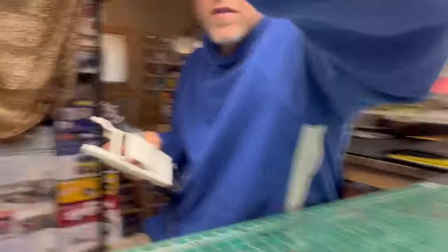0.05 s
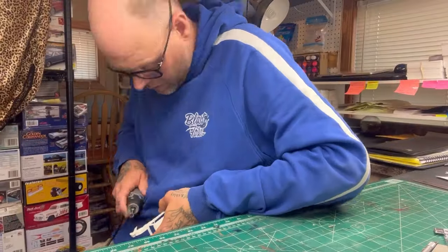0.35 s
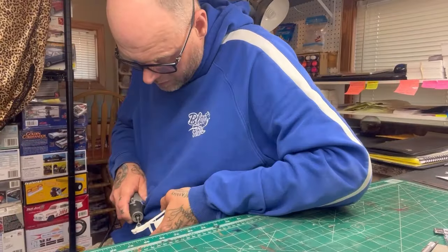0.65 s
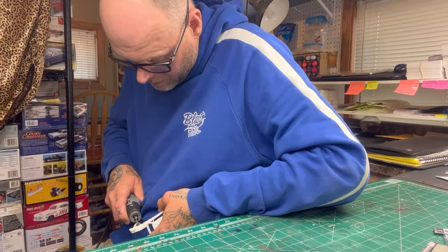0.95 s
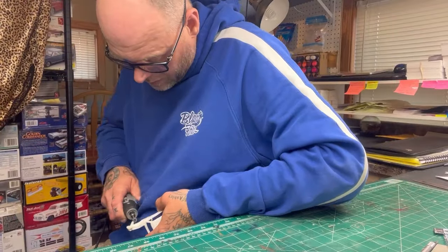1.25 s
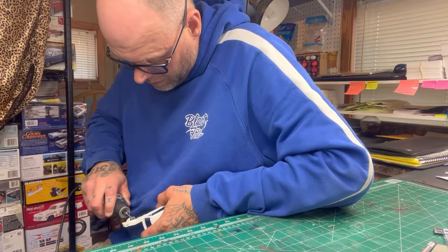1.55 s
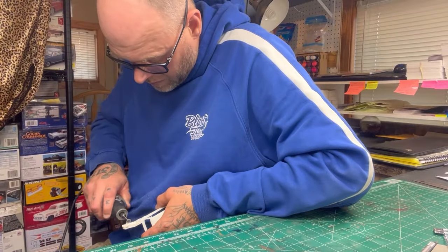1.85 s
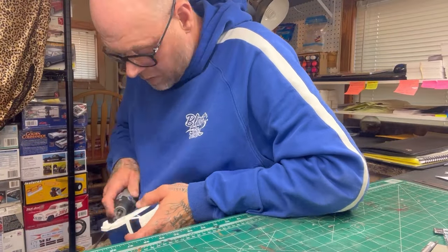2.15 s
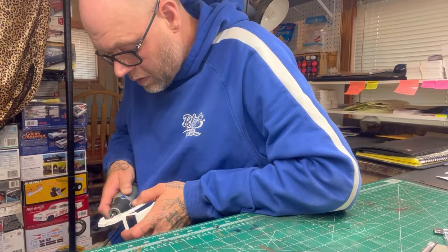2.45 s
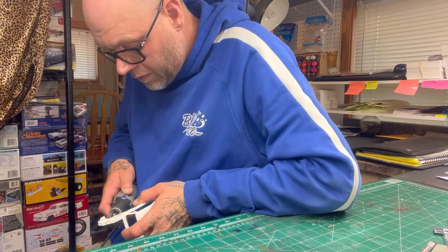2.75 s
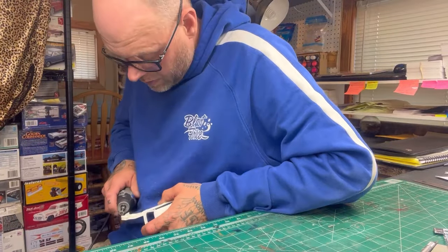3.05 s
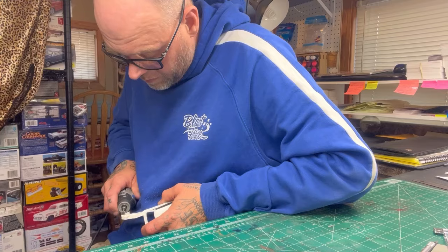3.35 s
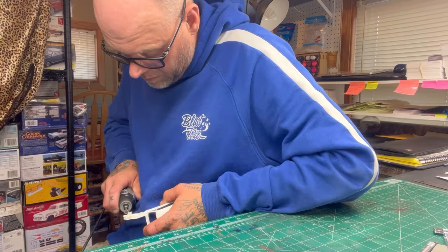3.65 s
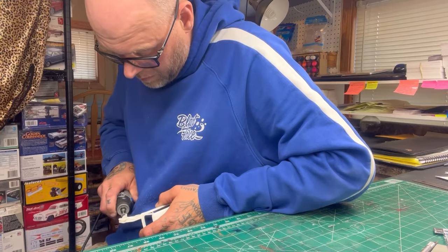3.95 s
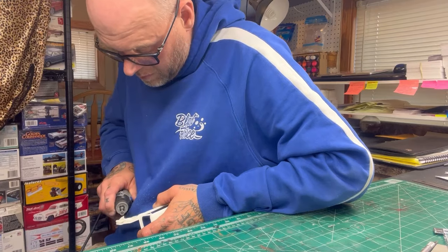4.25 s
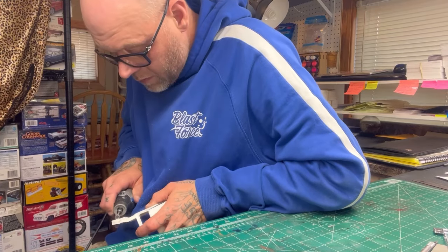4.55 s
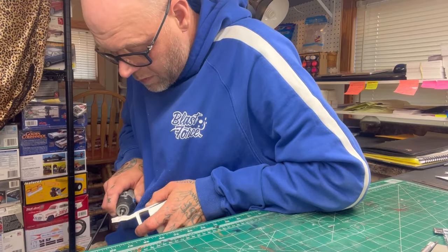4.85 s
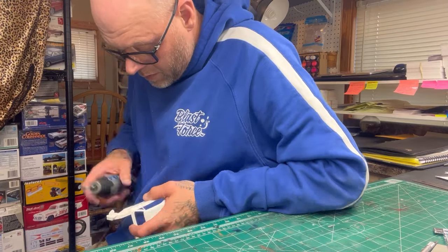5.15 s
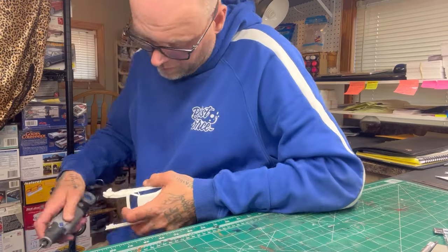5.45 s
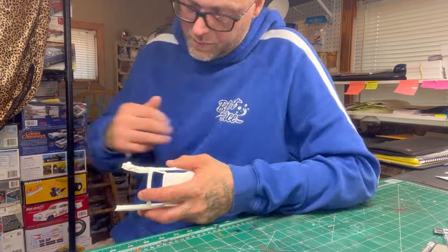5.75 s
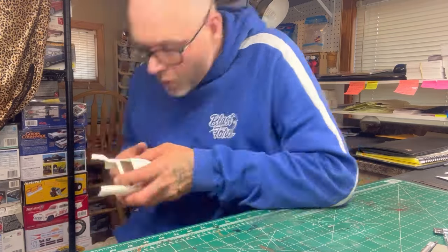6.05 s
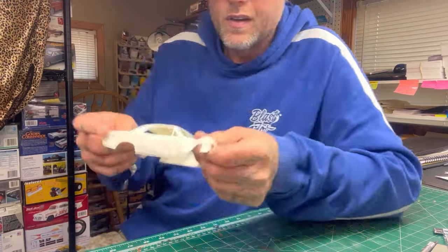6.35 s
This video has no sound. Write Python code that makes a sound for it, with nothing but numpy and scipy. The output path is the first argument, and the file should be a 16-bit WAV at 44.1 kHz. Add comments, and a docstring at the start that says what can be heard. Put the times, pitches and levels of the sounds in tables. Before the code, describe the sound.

A few light clacks of a tool being handled open the first quarter second. At about 0.4 seconds a small cordless rotary tool starts, with a thin, high whine and an airy hiss. From 0.6 to 1.3 seconds the bit presses twice into a plastic model body, buzzing and grinding as the motor slows, and the edge gives piercing squeals, loudest around 1.2 seconds. From 1.5 seconds the bit skims the plastic in short scrapes over the whine. Between 2.5 and 5 seconds these become quick, raspy dabs, with sharp ticks as it snags on the hollow shell. The tool is switched off at 5.5 seconds and knocks on the workbench at about 5.7, followed by a few lighter taps. Hands and sleeves brush softly over the model until about 6.3 seconds. Everything is close, in a small, dry room with faint background noise.

```python
"""A small cordless rotary tool trims a plastic model body at a workbench in a cluttered room. First a few
handling clacks sound. The motor starts and its chopped drive whines. The bit is pressed in, biting once a turn,
until drag slows the shaft and the thin edge squeals; then it dabs and skims the edge, snagging on the hollow
shell. At last the tool is switched off and knocks on the bench as it is set down, and hands and sleeves brush
the model."""
import sys
import numpy as np
from scipy import signal
from scipy.fft import rfft, irfft, next_fast_len
from scipy.io import wavfile
from scipy.ndimage import uniform_filter1d, map_coordinates

SR = 44100
rng = np.random.default_rng(int(sys.argv[2]) if len(sys.argv) > 2 else 0)


def master(y):
    """Save y as 16-bit WAV."""
    cut = np.clip(np.atleast_2d(y).T, -1, 1)
    pcm = np.round(cut * 32767)  # scale
    wavfile.write(sys.argv[1], SR, pcm.astype(np.int16))


N = 282715
TIME = np.arange(N) / SR

# Spectra of the room noise and its closing rumble. Each row: frequency in Hz, relative level in dB.
AIR = [(24, -84), (40, -47), (124, -38.5), (215, -20), (422, -1), (600, -4.5), (663, -7), (810, -5.5),
       (1090, -8), (1240, -12), (1720, -13.5), (2210, -13), (4680, -32.5), (16000, -35.5)]
RUMBLE = [(20, -9), (65, -2.5), (130, -6.5), (220, -10), (400, -26), (1500, -37)]
# Reverberation. Each row: frequency in Hz, time to decay by 60 dB in seconds.
ROOM_DECAY = [(200, 0.18), (2000, 0.1), (14000, 0.069)]
# Level difference between the ears. Each row: frequency in Hz, left over right in dB.
EAR_LEVEL = [(60, -6), (130, 7), (290, -7), (640, -6.5), (1410, -6), (3100, -5.5), (6820, -1.5),
             (15000, -7)]
# Phase difference between the ears. Each row: frequency in Hz, lead of the left in radians.
EAR_PHASE = [(0, 2.95), (2580, 1.5), (2930, 0.24), (3790, 4.6), (5000, 0.5), (5680, 8.07), (6290, 7.12),
             (16500, 7.17)]
# Strokes of hands and sleeves. Each row: start and end in seconds, level in dB, cutoff in Hz.
BRUSHES = [(0.193, 0.24, -61.5, 11900), (5.555, 5.587, -50.5, 8900), (5.783, 5.858, -49, 5430),
           (5.847, 5.879, -49.5, 5240), (5.892, 5.921, -48, 5530), (5.938, 5.962, -47, 5400),
           (5.99, 6, -44, 5060), (5.999, 6.07, -64, 12600), (6.105, 6.126, -35.5, 14700),
           (6.133, 6.31, -69.5, 10600), (6.197, 6.277, -55.5, 4440)]
# Spectrum of their friction. Each row: frequency in Hz, relative level in dB.
CLOTH = [(200, -27.5), (400, 5), (1500, -1.5), (2800, 2), (3600, 1.5), (4800, -2), (7000, -5), (11000, 2.5),
         (16000, 2)]
# Handling clacks and blows on the bench. Each row: start in seconds, relative levels of ring and crack # in dB,
# cutoff of the crack in Hz, left over right in dB.
HANDLING_CLACKS = [(.0115, -18, -14, 13900, -9), (.0428, -37, -17.5, 13100, -20.5), (.0475, -17, -27, 12000, 8),
                   (.0822, -6, -7, 5700, -6.5), (.085, -32, -15, 4400, 20.5), (.1145, -18.5, -26.5, 8100, -9),
                   (.227, -64.5, -30, 5650, -13.5)]
BENCH_KNOCKS = [(5.567, -52, -35, 5600, -19), (5.659, -30, -11, 2700, -11), (5.6607, -12.5, -45, 2530, -17),
                (5.6725, -44, -29.5, 7100, 18), (5.6755, -40, -27, 4040, -27),
                (5.854, -56, -31.5, 3760, -23), (5.90, -31, -25, 4350, -13.5),
                (6.218, -34.5, -35, 4004, -10)]
# Modes of the struck bodies. Each row: frequency in Hz, relative level in dB, 60 dB decay in seconds.
HANDLED_MODES = [(490, -12, 0.079), (740, -7, 0.017), (857, 4, 0.021), (1340, -10.5, 0.027), (2600, -9, .012)]
BENCH_MODES = [(377, -12, 0.073), (472, -6, 0.055), (655, 2.5, 0.02), (860, 7, 0.0085), (1195, 1, 0.017),
               (1280, 1, 0.012), (2780, -1, 0.013)]
SHELL_MODES = [(2337, 0.5, 0.015), (2510, 0.5, 0.018)]
# Spectrum of motor brushes and cooling air. Each row: frequency in Hz, relative level in dB.
MOTOR_HISS = [(120, -43), (200, -39), (448, -6.5), (2380, -15), (2860, -5.5), (3190, -9.5), (5040, -12),
              (5520, -15.5), (7140, -13.5), (10100, -20.5), (12200, -9.5), (16000, -21.5)]
# Shaft and bearing lines. Each row: multiple of the shaft rate, relative level in dB, jitter in Hz.
MOTOR_ORDERS = [(1, -12.5, 25), (2, -18, 20), (7, -22, 55), (8, -21, 65), (9, -21, 75), (11, -21, 120),
                (12.05, -9.5, 70), (13, -19, 110), (15.1, -25, 120)]
# Tones of the chopped drive. Each row: multiple of the drive rate, level relative to the whine in dB.
DRIVE_TONES = [(1, -21), (2, -19), (3, -1)]
# The whine's overtones. Each row: drive multiple to which the shaft rate adds, relative level in dB.
SIDEBANDS = [(3, 0), (4, -6), (5, -2), (7, 0), (13, -4), (15, -2)]
# Envelopes of the whine and of its overtones. Each row: time in seconds, level in dB.
WHINE_LEVEL = [(0.46, -54), (.6, -56), (.97, -53), (1.25, -57), (1.5, -54.5), (2.13, -53), (2.19, -61.5),
               (2.3, -53), (2.58, -65), (2.7, -55), (2.9, -64), (3.15, -62), (3.7, -56), (4.09, -55.5),
               (4.18, -70), (4.25, -58.5), (4.55, -54.5), (4.85, -57.5), (5.48, -53)]
SIDEBAND_LEVEL = [(.5, -64), (2.1, -72), (2.3, -60), (3.0, -64), (3.4, -64.5), (4.4, -72), (5.4, -69)]
# The shell's forced vibration. Each row: multiple of the shaft rate, level at full load in dB.
GROAN_ORDERS = [(1, -48), (5, -50), (6, -47.5), (7, -48.5), (8, -51)]
# Squeals of the edge. Each row: start and end in seconds, frequency in Hz, level in dB.
SQUEALS = [(0.898, 1.042, 12760, -37), (1.122, 1.16, 14300, -31), (1.143, 1.175, 13200, -25.5),
           (1.187, 1.213, 12940, -28), (1.215, 1.248, 12670, -26), (1.868, 1.885, 5067, -36),
           (3.622, 3.633, 8215, -27)]
# Spectra of the three voices of the cut. Each row: frequency in Hz, relative level in dB.
SHELL = [(900, -23), (1800, -13.5), (2400, -2.5), (3000, -5.5), (3650, -1), (4250, 4.5), (4650, -3),
         (5100, 9), (5700, -12), (7000, -48)]
SCRAPE = [(4500, -33), (5600, -4), (6400, 0), (6900, -1.5), (8000, 6.5), (9200, -3.5), (10100, -8),
          (12000, -39)]
SIZZLE = [(9800, -29), (11200, -3.5), (12600, -2), (13100, 3), (13600, 1.5), (14400, -4), (15200, 0.5),
          (17000, -5)]
# Two long presses, a curve each. Each row: time in seconds, level and shell boost in dB, drag in Hz.
PRESSES = [
    [(.612, -45.5, -4, 45), (.74, -39.5, -5.5, 125.9), (.78, -37.5, -11, 229), (.85, -40.5, -7, 228.6),
     (.91, -39.5, -11, 314.6), (1.045, -41, -17, 323.7)],
    [(1.1, -43, -9, 160), (1.15, -42.5, -5, 335.2), (1.215, -34.5, -10, 317.7), (1.24, -24, -11, 309.4),
     (1.254, -27.5, -7.5, 304)],
]
# Short cuts along the edge. Each row: start and end in seconds, level and shell boost in dB, drag in Hz.
CUTS = [(1.548, 1.612, -47, -10.5, 50), (1.65, 1.668, -36.5, -8, 127), (1.72, 1.857, -50, -2.5, 44.6),
        (1.867, 1.887, -32.5, -15, 206), (1.982, 2.09, -44.5, -7, 85), (2.265, 2.329, -45, -15, 12),
        (2.344, 2.398, -41.5, -7, 145), (2.44, 2.503, -45.5, -1, 97), (2.51, 2.537, -35, -12, 76),
        (2.627, 2.655, -48.5, -5, 32), (2.708, 2.76, -43, -6.5, 70), (2.772, 2.797, -40, -10, 78),
        (2.8, 2.816, -49, -1, 51), (3.131, 3.148, -37, -2, 27.5), (3.228, 3.248, -36, -8.5, 31.2),
        (3.321, 3.344, -33.5, -10.5, 115), (3.476, 3.493, -34, -8, 48.7), (3.53, 3.548, -43.5, 0, 18.8),
        (3.551, 3.58, -34.5, -10.5, 142), (3.616, 3.654, -40, -5.5, 133), (3.743, 3.76, -37.5, -3, 100),
        (3.783, 3.815, -46, -17, 8.1), (3.817, 3.833, -33.5, -9.5, 33), (3.876, 3.895, -34, -10, 67),
        (3.914, 3.953, -31, -10.5, 165), (3.962, 3.999, -29.5, -16.5, 152),
        (4.144, 4.175, -46.5, -33, 23.4), (4.235, 4.29, -50.5, -17, 7.5), (4.402, 4.426, -33, -8, 103),
        (4.459, 4.54, -46, -5.5, 83), (4.614, 4.656, -56, 1, 73), (4.705, 4.752, -41.5, -15, 13.8),
        (4.79, 4.818, -39.5, -12, 14), (4.829, 4.856, -40, -10, 21.8), (4.869, 4.882, -43.5, -7, 8.6),
        (5.02, 5.046, -36.5, -0.5, 74)]
# Snags of the bit. Each row: start in seconds, then level, shell boost and knock level in dB.
SNAGS = [(1.103, -36.5, -16, -56), (2.503, -35.5, 1.5, -33.5), (2.69, -38, -2, -33),
         (3.032, -31.5, -7, -40), (3.132, -43, -2, -35.5), (3.172, -32, -3.5, -42), (3.273, -36, -5.5, -47),
         (3.285, -42.5, -4, -55), (3.323, -44, -0.5, -38), (3.372, -42, -1, -49), (3.551, -29, -9.5, -54),
         (3.675, -41, -3.5, -39.5), (3.904, -29.5, -13, -49), (3.96, -30.5, -12, -54),
         (4.058, -30, -15, -42), (4.093, -39, -9.5, -39), (4.402, -32, -8.5, -47), (4.542, -42, 4, -40),
         (4.83, -32.5, -13, -63), (4.931, -31, -11, -39.5)]

ON_S, OFF_S, HISS_END_S = .4, 5.5, 5.6
DRIVE_HZ, FREE_HZ = 972, 1000  # chopping rate; shaft rate when warm and unloaded
COLD_SAG_HZ, WARM_UP_S, HUNT_DEPTH_HZ = 80, 1.3, 6.5
INERTIA_S, COAST_HZ_PER_S = .045, 440
MOTOR_DB, COLD_DB, COAST_DB = -52.5, -2, -5  # base level; change when cold; change when coasting
SNAG_S, SNAG_DRAG_HZ = .004537, 259.6
DAB_S, RASP_S, HEAVY_DB = .061, .032, -40  # short touches dab; shorter or heavier ones rasp
SWELL_DB, DAB_FADE_DB = 3.5, 6  # a cut deepens as it goes, but a dab fades
SHELL_RISE, SIZZLE_FALL = 1.134, .78  # frequency factors reached along the edge
TOP_HZ = 15950


def amp(db):
    """Decibels to amplitude ratio."""
    return 10 ** (np.asarray(db) / 20)


def unit(x):
    """Normalisation to rms 1."""
    return x / np.sqrt(np.mean(x ** 2) + 1e-20)


def along(points, hz):
    """Interpolation of (Hz, value) points on a logarithmic frequency axis."""
    knots_hz, values = np.transpose(points)
    return np.interp(np.log(hz + 1), np.log(knots_hz + 1), values)


def curves(rows):
    """Linear interpolation in time of each column after the first."""
    times, *columns = np.transpose(rows)
    return [np.interp(TIME, times, column) for column in columns]


def wobble(rate):
    """Smooth random modulation with rate knots a second."""
    return map_coordinates(rng.standard_normal(int(N * rate / SR) + 4), [TIME * rate], order=2)


def filtered(x, response):
    """Filtering as multiplication of the spectrum by a frequency response."""
    size = x.shape[-1]
    padded = next_fast_len(size + 8192)
    return irfft(rfft(x, padded) * response(np.fft.rfftfreq(padded, 1 / SR)), padded)[..., :size]


def coloured(x, spectrum):
    """Spectral shaping by (Hz, dB) points, at rms 1."""
    return unit(filtered(x, lambda hz: amp(along(spectrum, hz))))


def noise():
    """White Gaussian noise."""
    return rng.standard_normal(N)


def phase(hz):
    """Phase as the time integral of frequency."""
    return 2 * np.pi * np.cumsum(hz) / SR


def gate(start, end, rise, fall):
    """An envelope with linear attack and exponential release, all in seconds."""
    return np.clip((TIME - start) / rise + .5, 0, 1) * np.exp(-np.clip((TIME - end) / fall, 0, 30))


def background():
    """Ambient noise, partly coherent between the ears, gives way to a low rumble at the very end."""
    shared = noise()
    air = coloured(np.array([1.72 * shared + .5 * noise(), shared + 1.9 * noise()]), AIR)
    late = np.clip((TIME - 6.31) / .012, 0, 1)
    return amp(-57 - 5.4 * late) * air + amp(-53.5) * late * coloured(noise(), RUMBLE)


def room(x):
    """Reverberation: a diffuse tail, different at each ear, decays fastest in the treble."""
    hz, t, spectra = signal.stft(rng.standard_normal((2, SR // 3)), SR, nperseg=256)
    tail = signal.istft(spectra * amp(-60 * t / along(ROOM_DECAY, hz)[:, None]), SR, nperseg=256)[1]
    delayed = np.pad(x, (130, 0))[None]
    return signal.fftconvolve(delayed, tail / np.linalg.norm(tail[0]), axes=1)[:, :N]


def placed(work, tone):
    """Interaural differences set both to the right; moving hands and clutter scatter only the work."""
    t = np.arange(SR // 40) / SR
    clutter = rng.standard_normal((2, 2, len(t))) * amp(-60 * t / .021) * (t > .001)
    one, other = [signal.fftconvolve(work, c / np.linalg.norm(c[0]), axes=1)[:, :N] for c in clutter]
    pose = 2 * wobble(2)
    scattered = np.cos(pose) * one + np.sin(pose) * other
    side = np.array([[.5], [-.5]])
    bench_echo = lambda hz: 1 + .013 * np.exp(-2j * np.pi * hz * .00137)
    direct = filtered(work + tone, lambda hz: np.exp(1j * side * along(EAR_PHASE, hz)) * bench_echo(hz))
    return filtered(direct + amp(-6.5) * scattered, lambda hz: amp(side * along(EAR_LEVEL, hz)))


def low_cut(x, cutoff_hz):
    """A high-pass filter takes away the bass."""
    return signal.sosfilt(signal.butter(4, cutoff_hz, "highpass", fs=SR, output="sos"), x)


def brushing():
    """Sliding friction of skin and cloth on plastic makes short strokes of grainy noise."""
    grain = coloured(noise() * amp(4.8 * wobble(700)), CLOTH)
    out = np.zeros(N)
    for start, end, db, top_hz in BRUSHES:
        stroke = unit(filtered(grain, lambda hz: 1 / np.sqrt(1 + (hz / top_hz) ** 6)))
        out += amp(db) * gate(start, end, .0098, .008) * stroke
    return out


def blows(rows, modes):
    """An impact gives a broadband crack and excites the damped modes of the struck body."""
    out, t = np.zeros((2, N + SR)), np.arange(SR // 8) / SR
    for start, ring_db, crack_db, top_hz, pan_db in rows:
        ring = sum(amp(db + rng.normal() - 60 * t / t60) * np.sin(2 * np.pi * hz * t)
                   for hz, db, t60 in modes)
        burst = rng.standard_normal(len(t))
        grit = unit(filtered(burst, lambda hz: (hz > 400) / np.sqrt(1 + (hz / top_hz) ** 6)))
        dull = filtered(grit, lambda hz: 1 / np.sqrt(1 + (hz / 2500) ** 2))
        crack = grit * amp(-60 * t / .014) + dull * amp(-29 - 60 * t / .08)
        sound = amp(ring_db - 16) * ring + amp(crack_db - 10.5) * crack
        out[:, round(start * SR):][:, :len(t)] += amp([[pan_db / 2], [-pan_db / 2]]) * sound
    return out[:, :N]


def cold():
    """Exponential relaxation from 1 at switch-on towards 0 as the motor warms."""
    return np.exp(-np.clip(TIME - ON_S, 0, None) / WARM_UP_S)


def touches():
    """All brief contacts, cuts and snags alike, in the columns of CUTS."""
    return list(CUTS) + [(s, s + SNAG_S, db, shell_db, SNAG_DRAG_HZ) for s, db, shell_db, _ in SNAGS]


def shaft_speed():
    """Inertia makes the shaft rate, in Hz, lag behind its load; switched off, the shaft coasts."""
    drag = sum(hz * ((TIME >= start) & (TIME < end)) for start, end, _, _, hz in touches())
    for press in PRESSES:
        drag = drag + curves(press)[2] * ((TIME >= press[0][0]) & (TIME < press[-1][0]))
    target = (FREE_HZ + HUNT_DEPTH_HZ * wobble(7) - COLD_SAG_HZ * cold() - drag) * (TIME > ON_S)
    pole = np.exp(-1 / (INERTIA_S * SR))
    lagged = signal.lfilter([1 - pole], [1, -pole], target)
    return np.clip(lagged - COAST_HZ_PER_S * np.clip(TIME - OFF_S, 0, None), 0, None)


def motor(speed):
    """Brushes and cooling air hiss; shaft and bearing lines follow the rotation and fade as it slows."""
    sputter = amp(2.4 * wobble(900))
    hiss = coloured((noise() + .5 * np.array([noise(), noise()])) * sputter, MOTOR_HISS)
    lines = sum(amp(db + .83 * wobble(24)) * np.sin(phase(order * speed + jitter_hz * wobble(500)))
                for order, db, jitter_hz in MOTOR_ORDERS)
    running = np.clip((speed - 450) / 100, 0, 1) * gate(ON_S, HISS_END_S, .01, .012)
    level = running * amp(MOTOR_DB + COLD_DB * cold() + COAST_DB * (TIME > OFF_S))
    powered = gate(ON_S, OFF_S, .01, .035)
    return level * (amp(-1.5) * hiss + np.sqrt(2) * powered * (speed / DRIVE_HZ) ** 6 * lines)


def whine(speed):
    """Rotation modulates the chopped drive: sidebands droop under load and beat with it when free."""
    chop, turn = phase(DRIVE_HZ + .39 * wobble(7.3)), phase(speed)
    tones = sum(amp(db) * np.sin(order * chop) for order, db in DRIVE_TONES)
    sidebands = sum(amp(db + 2.5 * wobble(14)) * np.sin(order * chop + turn) for order, db in SIDEBANDS)
    free = np.clip((speed - 780) / 130, .3, 1)
    flicker_db = 2.6 * wobble(35) - 1.3
    beating = amp(curves(WHINE_LEVEL)[0] + flicker_db) * (np.sin(2 * chop + turn) + free * tones)
    return gate(.445, OFF_S, .028, .0043) * (beating + amp(curves(SIDEBAND_LEVEL)[0]) * sidebands)


def shell_knocks():
    """Free vibration: each snag rings the hollow shell, at a slightly different pitch for each spot."""
    out, t = np.zeros(N), np.arange(SR // 20) / SR
    for start, _, _, knock_db in SNAGS:
        detune = 1 + .035 * rng.normal()
        ring = sum(amp(db - 60 * t / t60) * np.sin(2 * np.pi * hz * detune * t)
                   for hz, db, t60 in SHELL_MODES)
        out[round(start * SR):][:len(t)] += amp(knock_db) * ring
    return out


def ping(peak_s=3.6349, hz=7960, db=-13, width_s=.001):
    """The thin edge catches the bit and gives one pure tone burst with a Gaussian envelope."""
    t = TIME - peak_s
    return amp(db) * np.exp(-(t / width_s) ** 2) * np.sin(2 * np.pi * hz * t)


def groan(speed, load):
    """Forced vibration: the labouring shaft shakes the shell at harmonics that sink with its rate."""
    pressed = gate(.76, 1.04, .065, .0053) + .5 * gate(1.145, 1.25, .016, .006)
    turn = phase(speed + 9 * wobble(200))
    tones = sum(amp(db + 2.5 * wobble(90)) * np.sin(order * turn + .11 * order * wobble(300))
                for order, db in GROAN_ORDERS)
    return np.sqrt(load) * pressed * tones


def squeals(speed, slip_rad=1.3, spray_db=-3.5):
    """Periodic excitation: once a turn the bit restarts the thin edge's ring and sprays fine chips."""
    out = np.zeros(N)
    turn_fraction = phase(speed) / (2 * np.pi) % 1
    since_kick = turn_fraction / np.maximum(speed, 1)
    kick = (.2 + np.sin(np.pi * turn_fraction)) * amp(1.5 * wobble(260))
    for start, end, hz, db in SQUEALS:
        ring = np.sin(2 * np.pi * hz * since_kick + slip_rad * wobble(600) + .5 * wobble(2500))
        spray = amp(spray_db) * coloured(noise(), SIZZLE)
        out += amp(db) * gate(start, end, .0021, .0025) * unit(kick * (unit(ring) + spray))
    return out


def contact():
    """Contact pressure sets the gains of shell, scrape and sizzle; brief or heavy touches add rasp."""
    # the scrape takes part of the shell boost, the sizzle none
    voice_gains = lambda db, shell_db: amp(db + np.array([[1], [.44], [0]]) * shell_db)
    heavy = lambda db: np.clip((db - HEAVY_DB) / 15, 0, .55)
    gains, rasp = np.zeros((3, N)), np.zeros(N)
    skip_db = 1.3 * wobble(220)  # a lightly held bit skips over the edge
    for press in PRESSES:
        db, shell_db, _ = curves(press)
        touch = gate(press[0][0], press[-1][0], .003, .0016)
        gains += voice_gains(db, shell_db) * touch
        rasp += .5 * heavy(db) * touch
    for start, end, db, shell_db, _ in touches():
        length = end - start
        touch = gate(start, end, .0015, .0021)
        dab = np.exp(-(length / DAB_S) ** 2)
        first_bite = 1 + .8 * dab * np.exp(-np.abs(TIME - start - .002) / .001)
        slope_db = (SWELL_DB - DAB_FADE_DB * dab) * np.clip((TIME - start) / length - .5, -.5, .5)
        pressure = first_bite * touch * amp(skip_db * (1 - dab) + slope_db)
        gains = np.maximum(gains, voice_gains(db, shell_db) * pressure)
        rasp = np.maximum(rasp, touch * (np.exp(-(length / RASP_S) ** 2) + heavy(db)))
    return gains, rasp


def bites(speed, load):
    """One bite a turn gives a wavering harmonic buzz; torn chips give noise pulsed at the same rate."""
    turn = phase(speed * (1 + .003 * wobble(300) + .003 * wobble(60)))
    waver_rad = .56 + .5 * load
    buzz = sum(amp(4 * wobble(45)) * np.sin(k * turn + rng.uniform(0, 2 * np.pi) + waver_rad * wobble(200))
               for k in range(4, 25))
    chips = noise() * (1 + .6 * np.cos(turn)) * amp(2.2 * wobble(700))
    return unit(buzz), unit(chips)


def spot_colour(x, depth_db=2):
    """Radiation varies from spot to spot on the shell: patches of random gain in time and frequency."""
    spectra = signal.stft(x, nperseg=256)[2]
    patches = uniform_filter1d(rng.standard_normal(spectra.shape), size=5, axis=0)
    patches = uniform_filter1d(patches, size=30, axis=1)
    return signal.istft(spectra * amp(depth_db * unit(patches)), nperseg=256)[1][:N]


def grinding(speed):
    """Source and filter: the bites excite shell, scrape and sizzle, and a heavy load adds the groan."""
    gains, rasp = contact()
    load = np.clip((880 - speed) / 250, 0, 1)  # 1 near a stall
    buzz, chips = bites(speed, load)
    travel = np.clip((TIME - 2.9) / 2.8, 0, 1)

    def voice(spectrum, rough):
        """Buzz and chips add in power; a stalling bit tears more than it cuts."""
        torn = np.clip(rough + rasp + .3 * load, 0, 1)
        return coloured(np.sqrt(1 - torn) * buzz + np.sqrt(torn) * chips, spectrum)

    def moving_voice(spectrum, shift, rough):
        """The spectrum fades into a transposed one as the bit works along the edge."""
        shifted = np.array(spectrum) * [shift, 1]
        return (1 - travel) * voice(spectrum, rough) + travel * voice(shifted, rough)

    shell = amp(-4.5) * moving_voice([(200, -63)] + SHELL, SHELL_RISE, rough=.18)
    scrape = amp(-5 - 1.5 * load) * voice(SCRAPE, rough=.12)
    sizzle = amp(-2.5) * moving_voice(SIZZLE, SIZZLE_FALL, rough=.12)
    # the torque throbs as the shaft slips against the drive
    throb_db = (1 + 2.5 * load) * np.sin(phase(DRIVE_HZ - speed))
    chatter = amp(throb_db * (1 - rasp) + 1.2 * wobble(140) + .7 * wobble(400))
    return spot_colour(chatter * (gains * [shell, scrape, sizzle]).sum(0)) + groan(speed, load)


def scene():
    """Superposition of tool, cut, handling and room; one shaft rate governs motor, whine and cut."""
    speed = shaft_speed()
    tool = motor(speed)
    cut = grinding(speed) + squeals(speed) + ping() + shell_knocks()
    work = tool + low_cut(cut, cutoff_hz=291) + brushing()
    hits = low_cut(blows(HANDLING_CLACKS, HANDLED_MODES) + blows(BENCH_KNOCKS, BENCH_MODES), cutoff_hz=305)
    near = placed(work, whine(speed)) + hits
    return near + amp(-14.5) * room((work + hits).mean(0)) + background()


def record(dry):
    """An ideal low-pass filter removes everything above the band limit."""
    return filtered(dry, lambda hz: hz < TOP_HZ)


dry = scene()
out = record(dry)
master(out)
```